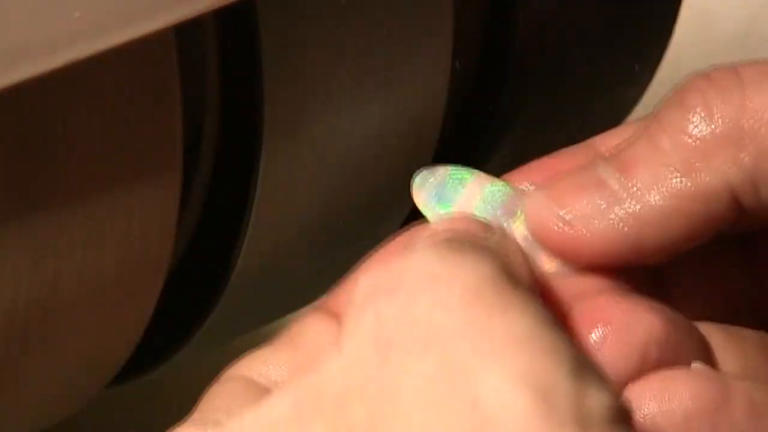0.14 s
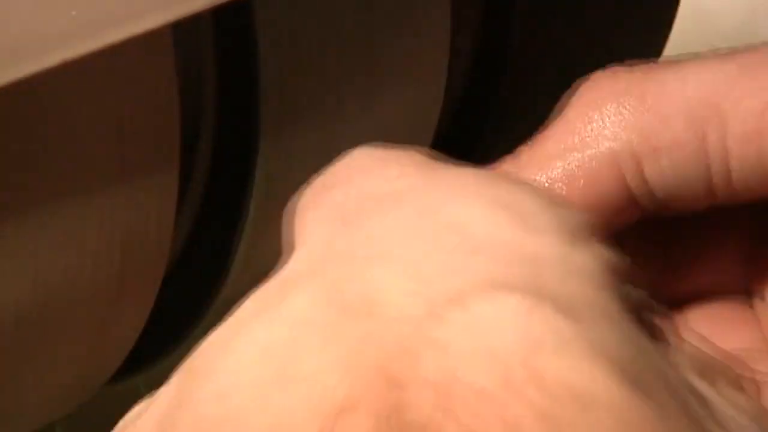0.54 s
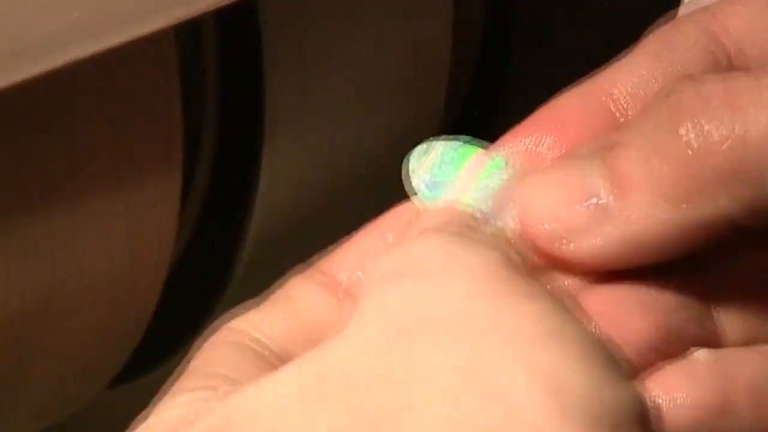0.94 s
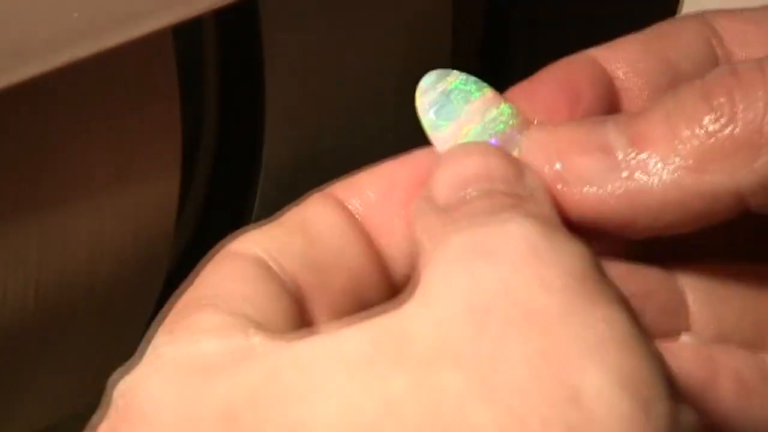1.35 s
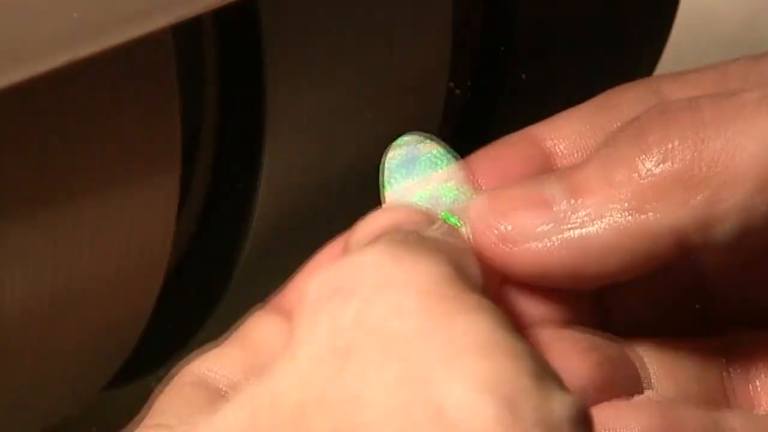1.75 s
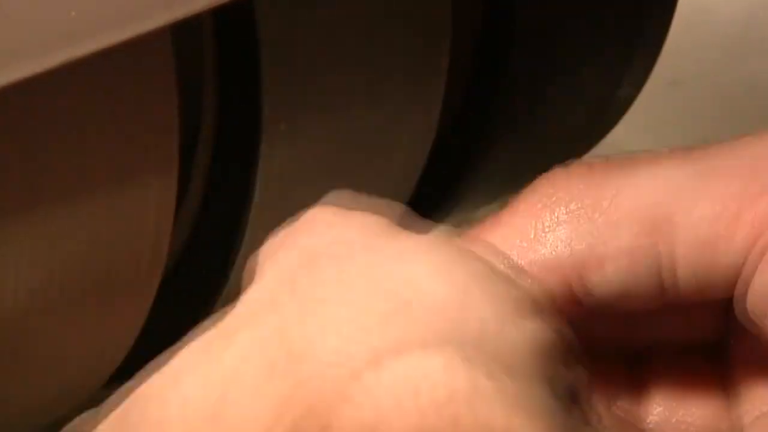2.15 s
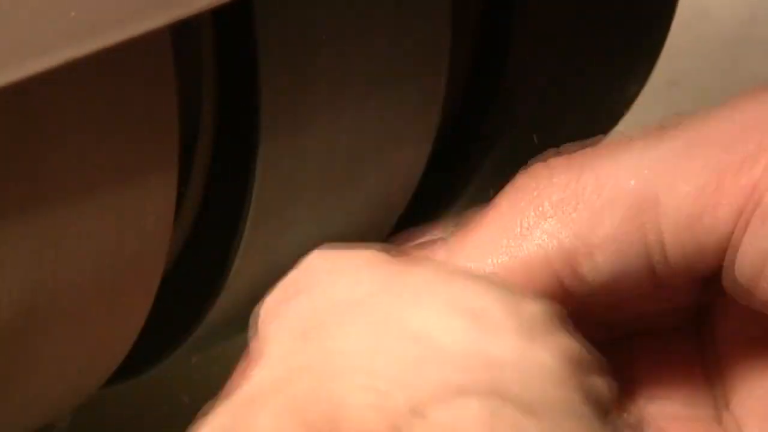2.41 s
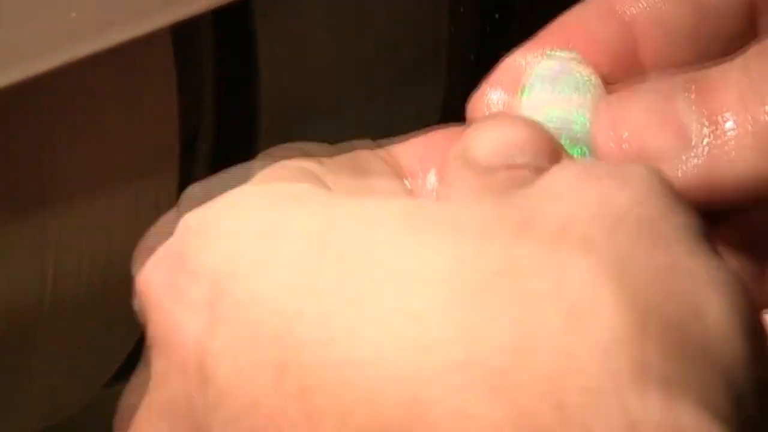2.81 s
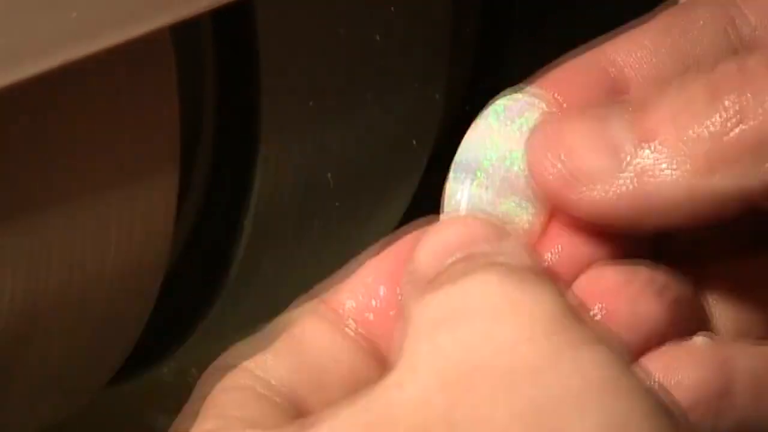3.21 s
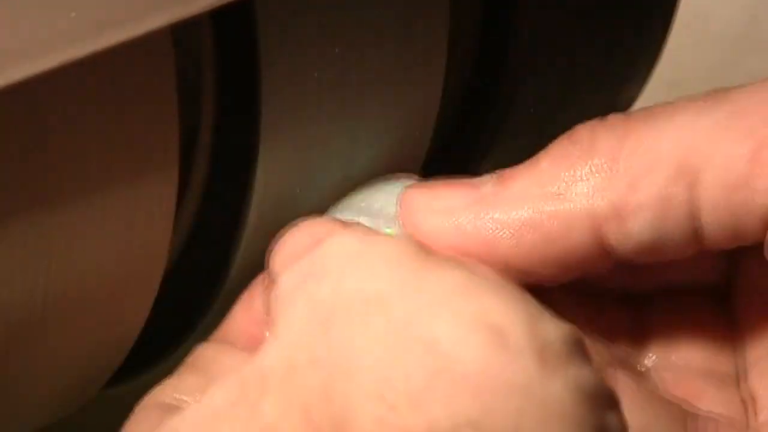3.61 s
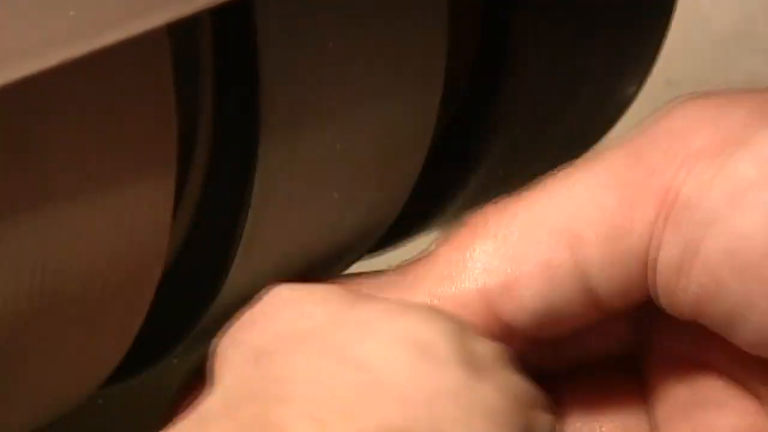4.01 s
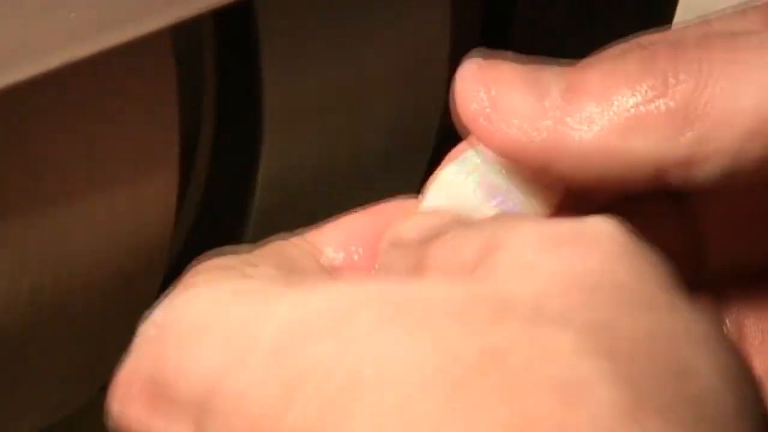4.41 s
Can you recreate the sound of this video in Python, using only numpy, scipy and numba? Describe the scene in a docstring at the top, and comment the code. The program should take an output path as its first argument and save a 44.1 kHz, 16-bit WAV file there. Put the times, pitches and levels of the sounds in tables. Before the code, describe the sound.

Two throbbing, ringing strokes of stone on a spinning wheel alternate with fast ticking spits of water over a steady motor hum.

```python
"""A gem cutter's bench, a stereo microphone close to a wet grinding wheel turning about 30 times a second.
First the motor drones, a small pump spits water twelve times a second and drops ping on the tray.
At 0.6 s a hand-held stone meets the wheel: grit rasps it, harder once a turn, and its rings glide as it
tilts. The spitting returns at 1.7 s, a second stroke follows at 2.7 s, and from 3.9 s pump and motor run
on. The recorder's gain control lifts the drone in the gaps and lets it sink under the rasp."""
import sys
import numpy as np
from scipy import signal
from scipy.fft import rfft, irfft, next_fast_len
from scipy.io import wavfile
from scipy.ndimage import uniform_filter1d
from numba import njit

SR = 44100
rng = np.random.default_rng(int(sys.argv[2]) if len(sys.argv) > 2 else 0)


def file_out(sig):
    """Save sig as 16-bit WAV at sys.argv[1]."""
    # one column per channel
    cols = np.atleast_2d(sig).T
    # limit, then scale
    lim = np.clip(cols, -1, 1)
    pcm = np.round(lim * 32767).astype(np.int16)
    wavfile.write(sys.argv[1], SR, pcm)


N = 201128

# rumble of the workshop: frequency_hz, relative_db
ROOM_SPECTRUM = [(18, -70), (30, -36), (237, -6.5), (533, 1.5), (832, -10), (1520, -7.5), (2840, -15.5),
                 (6920, -26.5), (12300, -42), (15600, -53)]
# mains hum of the windings: pitch_hz, level_db
MAINS_HUM = [(120, -60), (240, -50)]
# 1st, 2nd, 3rd .. multiple of the turn rate: relative_db
MOTOR_HARMONICS = [-33, -46, -21.5, -21, -14, -2.5, -9, -3.5, 1.5, -2, -1, 8, -2.5, -5, -6.5, -2, -1.5, -31,
                   -20, -33, -1.5, -15, -0.5, -20, -1.5, 2, -3, -13, -18, -7, -7, -10.5, 0, 0, -2.5, -13,
                   -33, 2.5]
# tones of the labouring motor: turn_multiple, level_db
STRAIN_TONES = [(15, -39), (18, -44), (21, -45), (28, -48.5)]
# when it labours: start_s, end_s
STRAIN_SPANS = [(.74, 1.666), (2.63, 3.8)]
# tones of the motor running free: turn_multiple, level_db
FREE_TONES = [(8, -48), (18, -42.5), (21, -44.5)]
# when it runs free: start_s, end_s
FREE_SPANS = [(.22, .8), (2.12, 2.72), (4.06, 4.7)]
# drops on the tray: start_s, level_db, pitch_hz
TRAY_DROPS = [(0.084, -25, 4050), (0.1653, -12.5, 3800), (0.2334, -17.5, 4130), (0.335, -26, 3900),
              (1.866, -20.5, 3360), (1.957, -19.5, 3500), (2.281, -25, 3450), (2.365, -22, 3480),
              (2.585, -26, 3350)]
# spits of the pump: start_s, relative_db, crest_delay_s, crest_db, squeak_hz, mist_db
PUMP_SPITS = [(0.0, -22.5, 0.0057, 14.5, 5770, -0.5), (0.065, -25.5, 0.014, 17.5, 4590, -1.5),
              (0.143, -18.5, 0.017, 15, 5970, -3.5), (0.224, -25.5, 0.005, 5, 5840, -0.5),
              (0.306, -27.5, 0.024, 19.5, 5040, 1), (0.387, -21.5, 0.0038, 3, 5150, -1.5),
              (0.464, -31.5, 0.021, 19.5, 5640, 1.5), (0.547, -19.5, 0.015, 14, 6300, -1.5),
              (1.683, -15, 0.0057, 3, 5960, -1.5), (1.756, -17.5, 0.034, -8, 5740, -2.5),
              (1.841, -16, 0.028, 7, 6250, -8), (1.916, -19.5, 0.024, 11, 5940, -3.5),
              (2, -18.5, 0.0083, 6, 5660, -1.5), (2.082, -25, 0.0096, 12.5, 5500, 2),
              (2.164, -25, 0.0097, 14, 9600, 3), (2.246, -21, 0.0014, 6, 5600, 1),
              (2.323, -21.5, 0.025, 16.5, 5430, -2.5), (2.413, -25.5, 0.0019, 19, 5600, -13),
              (2.444, -42, 0.0048, 23.5, 8080, -2), (2.49, -22, 0.0089, 14, 5800, -1),
              (2.568, -23, 0.024, 12, 5300, 2), (2.649, -25.5, 0.02, 17, 5530, 1),
              (3.862, -16.5, 0.0046, 9, 5500, -10), (3.94, -25, 0.036, 8.5, 5540, -4.5),
              (4.021, -20.5, 0.022, 11.5, 6350, -2.5), (4.104, -17.5, 0.022, 12.5, 6380, -4.5),
              (4.182, -22, 0.025, 10, 7270, -0.5), (4.262, -25, 0.011, 14, 5750, 4.5),
              (4.344, -21.5, 0.028, 15.5, 5980, -2), (4.429, -21, 0.019, 11.5, 6740, -5.5),
              (4.509, -21, 0.024, 4, 8100, -1)]
# colour of the spray: frequency_hz, relative_db
SPRAY_SPECTRUM = [(2000, 0.5), (2480, 1.5), (3180, -6), (3940, 4), (4520, -6), (5610, 4), (7010, 0),
                  (12000, -3.5), (15600, -20)]
# rings of the nozzle: pitch_hz, width_hz, relative_db
NOZZLE_RINGS = [(5580, 240, -4), (7790, 660, -3.5), (9800, 450, -10.5)]
# the hand's path, one list a stroke: time_s, rasp_db, tilt (0-1), chatter (times the low runout swing)
HAND_STROKES = [
    [(0.6, -20, 0.07, 1.4), (0.72, -22.5, 0.15, 0.9), (0.92, -17, 0.75, 0.66), (1.0, -22, 0.52, 0.56),
     (1.07, -16, 0.26, 1.1), (1.24, -15.5, 0.83, 0.67), (1.37, -17.5, 0.05, 1.25), (1.54, -15.5, 1.0, 0.94),
     (1.62, -21, 0.46, .9)],
    [(2.69, -19, 0.05, 0.74), (2.85, -19.5, 0.27, 0.69), (3.03, -17, 0.88, 0.82), (3.19, -15.5, 0.22, 1),
     (3.39, -20, 0.96, 0.81), (3.5, -14.5, 0.37, 1.5), (3.58, -19, 0.58, 0.44), (3.7, -20, 1, 0.94),
     (3.78, -22, 0.48, 0.42)],
]
# throb of the out-of-round wheel: turn_share, low_swing_db, upper_swing_db
WHEEL_RUNOUT = [(.04, -3.5, -2), (.2, -6, -3), (.42, -9, -5), (.66, -11, -6), (.75, -1, -1), (.87, 0, 0)]
# broad scrape under the rings: frequency_hz, relative_db
SCRAPE_SPECTRUM = [(900, -16), (1700, 3), (2040, 13), (3380, -4.5), (4550, -16), (5940, -22), (10900, -31),
                   (13700, -43), (15600, -96)]
# rings of stone and wheel: pitch_hz, width_hz, relative_db
STONE_RINGS = [(2312, 130, 0), (2603, 93, -3.5), (2932, 70, -4), (3155, 89, -5), (3445, 70, -2),
               (3650, 80, -1), (4120, 110, -0.5), (5060, 67, -5.5), (5376, 160, 3), (5920, 84, -2),
               (6710, 180, 0), (8590, 260, -5.5), (10500, 780, -6)]
# the ring that tilting frees, set by the grip of each stroke: pitch_hz
GRIP_RINGS = [5055, 5385]
# colour of the stereo side signal: frequency_hz, gain_db
SIDE_SPECTRUM = [(300, -52), (700, -27), (1800, -47.5), (5000, -60), (6500, -47), (10000, -51)]
# left channel over right: frequency_hz, difference_db
LEFT_BALANCE = [(60, 1.3), (290, 1.8), (640, 2.4), (1410, 1.3), (2500, 0.0), (5200, 0.1), (6200, 1.3),
                (8000, 1.2), (9500, 0.1), (15000, 0.0)]

IDLE_HZ, SAG_HZ = 29.86, .25   # turn rate running free, and its drop under average load


def from_db(db):
    """Gain of a level in dB."""
    return np.exp(np.asarray(db) * (np.log(10) / 20))


def rms_one(x):
    """Scaled to rms 1."""
    return x / np.sqrt(np.mean(x ** 2) + 1e-20)


def add(out, s, sound):
    """Lays a short sound into out at time s."""
    at = round(s * SR)
    out[at:at + len(sound)] += sound[:N - at]


def during(spans):
    """1 inside the spans, with soft edges."""
    t = np.arange(N) / SR
    return uniform_filter1d(sum(1. * (t > start) * (t < end) for start, end in spans), size=SR // 10)


def colour(x, points):
    """Filtered by (Hz, dB) points joined on a log-frequency axis."""
    size = next_fast_len(N)
    hz = np.maximum(np.arange(size // 2 + 1) * SR / size, 1)
    hz_points, db_points = np.transpose(points)
    gain = from_db(np.interp(np.log(hz), np.log(hz_points), db_points))
    return irfft(rfft(x, size) * gain, size)[..., :N]


def passband(x, order, hz, kind):
    """Low-, high- or band-pass with a flat top."""
    return signal.sosfilt(signal.butter(order, hz, kind, fs=SR, output="sos"), x)


def resonance(x, hz, width_hz):
    """Two-pole band-pass of gain 1 on top."""
    r = np.exp(-np.pi * width_hz / SR)
    gain = (1 - r * r) / 2
    return signal.lfilter([gain, 0, -gain], [1, -2 * r * np.cos(2 * np.pi * hz / SR), r * r], x)


@njit
def glide(x, hz, width_hz):
    """Two-pole resonance whose centre moves sample by sample."""
    r = np.exp(-np.pi * width_hz / SR)
    y = np.zeros(len(x))
    for i in range(2, len(x)):
        y[i] = x[i] - x[i - 2] + 2 * r * np.cos(2 * np.pi * hz[i] / SR) * y[i - 1] - r * r * y[i - 2]
    return y


def drift(rate_hz):
    """Smooth random wander of rms 1."""
    r = np.exp(-80 * np.pi * rate_hz / SR)
    slow = signal.lfilter([1], [1, -2 * r, r * r], rng.standard_normal(N // 40 + 2002))[2000:]
    return np.interp(np.arange(N) / 40, np.arange(len(slow)), rms_one(slow))


def grains(per_s, spread_db):
    """Random clicks of uneven size; rms 1."""
    sizes = from_db(spread_db * np.minimum(rng.exponential(1, N), 5)) * rng.choice([-1, 1], N)
    return rms_one(sizes * (rng.random(N) < per_s / SR))


def ping(level_db, hz, t60_s, attack_s, width_hz, clean):
    """A short touch rings a small resonance, partly clean and partly noisy."""
    t = np.arange(SR // 10) / SR
    noisy = rms_one(resonance(rng.standard_normal(len(t)), hz, width_hz))
    envelope = from_db(level_db - 60 * t / t60_s) * (1 - np.exp(-t / attack_s))
    return envelope * (clean * np.sin(2 * np.pi * hz * t) + (1 - clean) * .52 * noisy)


def room():
    """The workshop's rumble flutters behind everything."""
    return from_db(-41) * rms_one(colour(rng.standard_normal(N), ROOM_SPECTRUM)) * from_db(1.3 * drift(44))


def motor(turns, contact_turns):
    """Multiples of the turn rate, loosely bunched into a beat each turn, over mains hum."""
    drone = sum(from_db(db + .53 * drift(1)) * np.cos(2 * np.pi * (k * (turns - .85) + rng.normal(0, .13)))
                for k, db in enumerate(MOTOR_HARMONICS, start=1))
    strain = sum(from_db(db + 2 * drift(9.9)) * np.sin(2 * np.pi * (k * contact_turns + .03 * drift(5)))
                 for k, db in STRAIN_TONES)
    free = sum(from_db(db + 2 * drift(6.5)) * np.sin(2 * np.pi * (k * turns + .081 * drift(7.1)))
               for k, db in FREE_TONES)
    hum = sum(from_db(db) * np.sin(2 * np.pi * hz * np.arange(N) / SR) for hz, db in MAINS_HUM)
    swells = during(STRAIN_SPANS) * strain + during(FREE_SPANS) * free
    return from_db(-42.5) * rms_one(drone) + swells + hum


def tray(pump_hz=12.376):
    """Drops ping on the tray, and a small part knocks twice a pump cycle, hard and soft in turn."""
    out = np.zeros(N)
    for s, level_db, hz in TRAY_DROPS:
        add(out, s, ping(level_db, hz, t60_s=.072, attack_s=.0043, width_hz=280, clean=.3))
    for k, s in enumerate(np.arange(.031, N / SR, .5 / pump_hz)):
        knock_db = -25 - 7 * (k % 2) + rng.normal(0, 1.2)
        add(out, s, ping(knock_db, hz=1525, t60_s=.035, attack_s=.004, width_hz=120, clean=.7))
    return out


def pump(crest_s=.0024):
    """Each spit is a burst of droplets that opens, crests with a squeak and leaves a dying spatter."""
    t = np.arange(SR // 8) / SR
    spatter = from_db(-13 - 72 * t) * np.clip(t / .081, 0, 1)
    flow, squeak_gain, squeak_hz, mist_db = np.zeros((4, N))
    for s, level_db, delay_s, crest_db, hz, fine_db in PUMP_SPITS:
        mist_db[round(s * SR):] = fine_db
        squeak_hz[round(s * SR):] = hz
        from_crest = (t - delay_s) / crest_s
        add(squeak_gain, s, from_db(level_db + crest_db) * np.exp(-(from_crest / 1.66) ** 2))
        crest = from_db((crest_db - 14) * np.exp(-from_crest ** 2))   # spray crests less than squeak
        open_s, length_s = .0014 + .29 * delay_s, .022 + .38 * delay_s
        body = np.clip(t / open_s, 0, 1) / (1 + (t / length_s) ** 6)
        add(flow, s, from_db(level_db) * (crest * body + spatter))
    droplets = grains(15000, spread_db=2.5)
    beads = grains(1400, spread_db=.5)   # sparser, larger beads ring the nozzle
    chirps = sum(from_db(db + 4.3 * drift(29)) * rms_one(resonance(beads, hz, width_hz))
                 for hz, width_hz, db in NOZZLE_RINGS)
    spray = rms_one(rms_one(colour(droplets, SPRAY_SPECTRUM)) + from_db(-5) * chirps)
    spray = passband(spray, 3, 1500, "high")
    dull = passband(spray, 2, 7000, "low")
    mist = from_db(mist_db + 2.33 * drift(68)) * (spray - dull)   # finer droplets come and go
    squeak = from_db(-9.5) * squeak_gain * rms_one(glide(droplets, squeak_hz, width_hz=240))
    gain = from_db(-13 + 1.8 * drift(110))
    return gain * (flow * (from_db(2.2 * drift(24)) * dull + mist) + squeak)


def hand():
    """Rasp level, tilt and chatter of the stone through time."""
    times, *columns = np.concatenate(HAND_STROKES).T
    return [np.interp(np.arange(N) / SR, times, column) for column in columns]


def touch(land_s=.013, lift_s=.12):
    """1 while the stone is on the wheel: it lands quickly and fades as it is drawn off."""
    t = np.arange(N) / SR
    touching = np.zeros(N)
    for stroke in HAND_STROKES:
        start, end = stroke[0][0], stroke[-1][0]
        fade = from_db(np.interp(t, [end, end + lift_s], [0, -29.5]))
        touching += fade * np.interp(t, [start - land_s, start, end, end + lift_s], [0, 1, 1, 0])
    return touching


def wheel(touching, lag_s=.06):
    """Turns of the wheel, slowed by pressure, and of the contact, which slides back as the stone tilts."""
    rasp_db, tilt, _ = hand()
    pressure = touching * from_db(1.5 * rasp_db)
    r = np.exp(-1 / (lag_s * SR))
    load = signal.lfilter([1 - r], [1, -r], pressure * touching.sum() / pressure.sum())
    turns = np.cumsum(IDLE_HZ - SAG_HZ * load) / SR
    return turns, turns - .13 * uniform_filter1d(tilt - .5, size=SR // 12)


def rim_grit(turns, repeat_share=.8):
    """Grit around the rim: each turn repeats most of the turn before."""
    steps = round(SR / IDLE_HZ)
    fresh = np.resize(grains(16000, spread_db=3), (int(turns[-1]) + 2, steps))
    track = signal.lfilter([1], [1, -repeat_share], fresh, axis=0).ravel()
    return rms_one(track[np.round(np.maximum(turns, 0) * steps).astype(int)])


def stone_rings(patches, tilt, low_hz, upper_hz):
    """Grit rings stone and wheel in three bands; each ring wakes as a gliding pitch passes it."""
    grip_hz = np.where(np.arange(N) / SR < HAND_STROKES[1][0][0] - .5, *GRIP_RINGS)
    bands = np.zeros((3, N))
    for k, (hz, width_hz, level_db) in enumerate(STONE_RINGS):
        woken = np.exp(-(np.log2(hz / low_hz) / .17) ** 2) + np.exp(-(np.log2(hz / upper_hz) / .1) ** 2)
        woken += tilt * (abs(hz / grip_hz - 1) < .03)
        gain = from_db(level_db + 10.2 * woken + 1.73 * drift(5.3) + 1.9 * (.5 - tilt) * (hz > 7500))
        tilted_hz = hz * (1 + .02 * (tilt - .5))
        bands[(hz > 4500) + (hz > 7500)] += gain * rms_one(glide(patches[k % 2], tilted_hz, width_hz))
    return [rms_one(band) for band in bands]


def grinding(touching, turns):
    """Grit rasps the stone, throbbing once a turn; two gliding rings climb as the stone tilts."""
    t = np.arange(N) / SR
    rasp_db, tilt, chatter = hand()
    low_hz, upper_hz = np.interp(tilt, [0, 1], [2780, 3620]), np.interp(tilt, [0, 1], [5600, 6700])
    share, low_swing, upper_swing = np.transpose(WHEEL_RUNOUT)
    low_throb_db = np.interp(turns, share, low_swing, period=1) * chatter
    upper_throb_db = np.interp(turns, share, upper_swing, period=1) * (.35 + .5 * tilt) + drift(40)
    # separate patches of grit drive the scrape, neighbouring rings and the glides
    scrape_grit, *patches, glide_grit = [rim_grit(turns) for _ in range(4)]
    scrape = rms_one(colour(scrape_grit, SCRAPE_SPECTRUM))
    low, upper, hiss = [rms_one(passband(scrape, 3, edges_hz, "band"))
                        for edges_hz in ([900, 4500], [4500, 7500], [7500, 16500])]
    low_rings, upper_rings, top_rings = stone_rings(patches, tilt, low_hz, upper_hz)
    bite_hz = low_hz * (1 + .091 * ((turns - share[3]) % 1 - .3))   # rises through each turn
    low_glide = rms_one(from_db(.7 * low_throb_db) * glide(glide_grit, bite_hz, width_hz=300))
    upper_glide = rms_one(glide(glide_grit, upper_hz, width_hz=250))
    low = rms_one(low + from_db(11) * low_rings + from_db(-.5) * low_glide)
    upper = rms_one(upper + from_db(-1) * upper_rings + from_db(-5.5) * upper_glide)
    hiss = rms_one(from_db(1) * hiss + top_rings)
    # the treble follows only about a third of the rasp's swing
    steady_db = -.65 * (rasp_db - np.concatenate(HAND_STROKES)[:, 1].mean())
    low *= from_db(-.5 + low_throb_db)
    upper *= from_db(-3 + 3.5 * tilt + steady_db + upper_throb_db)
    hiss *= from_db(-5.8 + steady_db + .77 * upper_throb_db)
    # the rasp is held 4 dB down at each stroke's start and eased up over its first second, balancing the gain
    # control's lift as the stroke begins
    starts = [stroke[0][0] for stroke in HAND_STROKES]
    rasp_rise_db = sum(np.interp(t, [s, s + 1], [-4, 0]) * (t > s - .1) for s in starts)
    return touching * from_db(rasp_db + rasp_rise_db) * (low + upper + hiss)


def scene():
    """The sound sits slightly left of the middle, the spray wider."""
    touching = touch()
    turns, contact_turns = wheel(touching)
    water = pump()
    mid = grinding(touching, contact_turns) + water + tray() + motor(turns, contact_turns) + room()
    smear = rng.standard_normal(1500) * from_db(-60 * np.arange(1500) / 1500)
    wide = mid + from_db(30) * water
    side = colour(signal.fftconvolve(wide, smear / np.linalg.norm(smear))[:N], SIDE_SPECTRUM)
    return np.array([colour(mid, [(hz, db / 2 * sign) for hz, db in LEFT_BALANCE]) + sign * side
                     for sign in (1, -1)])


def record(dry, response_s=.12, cutoff_hz=15450):
    """The recorder's slow gain control lifts quiet passages; peaks are rounded and the top is cut."""
    r = np.exp(-1 / (response_s * SR))
    power = np.mean(dry ** 2, axis=0)
    slow_power = signal.lfilter([1 - r], [1, -r], power, zi=[r * power[:SR // 4].mean()])[0]
    shortfall_db = -16 - 10 * np.log10(slow_power + 1e-12)
    lift_db = uniform_filter1d(np.clip(.63 * shortfall_db, 0, 8.5), size=SR // 4, origin=SR // 9)
    rounded = 1.753 * np.tanh(dry * from_db(lift_db) / 1.448)
    top_cut = signal.ellip(10, .5, 80, cutoff_hz, fs=SR, output="sos")
    return signal.sosfilt(top_cut, np.clip(rounded, -1, 1))


dry = scene()
out = record(dry)
file_out(out)
```